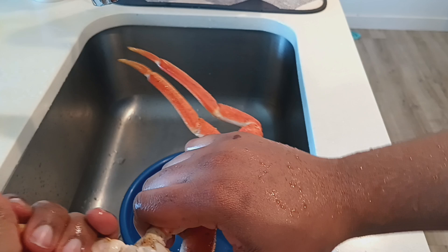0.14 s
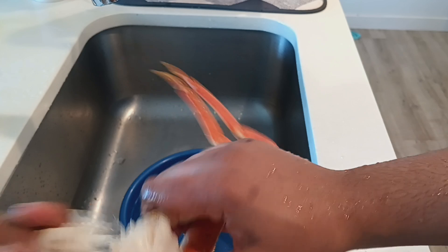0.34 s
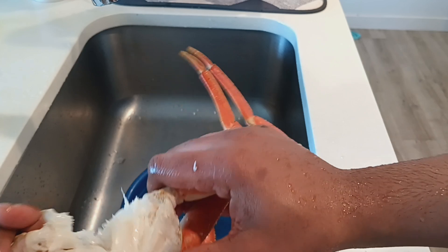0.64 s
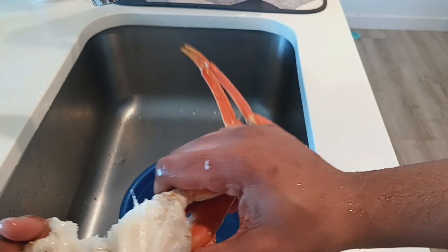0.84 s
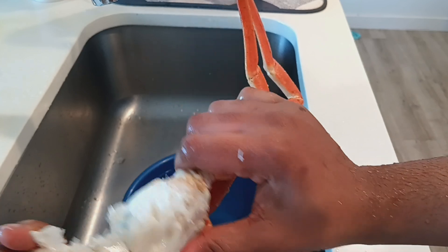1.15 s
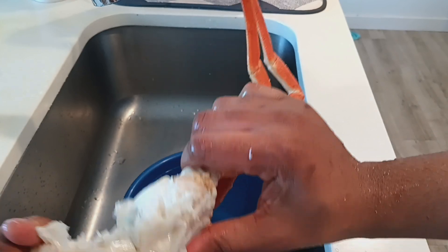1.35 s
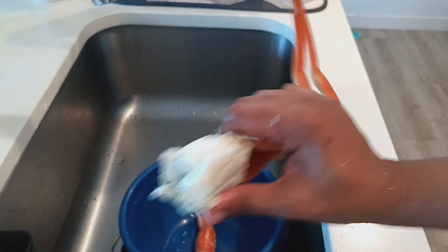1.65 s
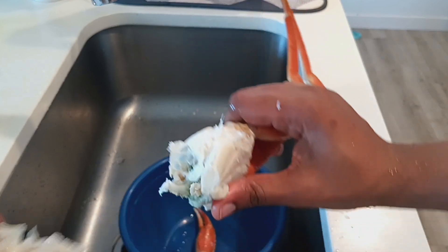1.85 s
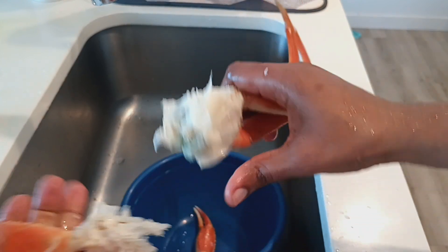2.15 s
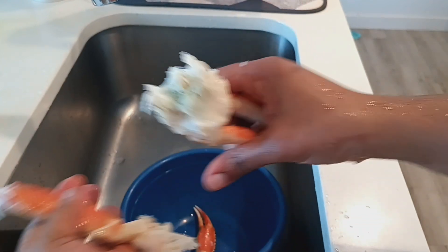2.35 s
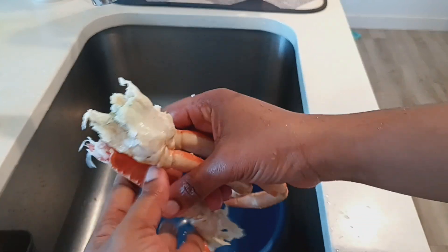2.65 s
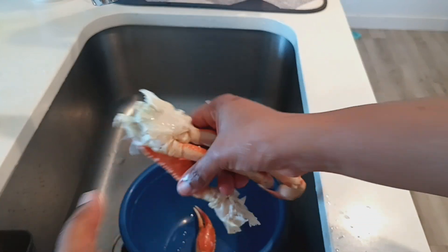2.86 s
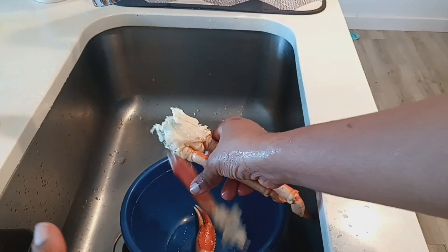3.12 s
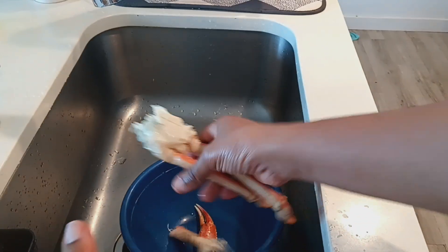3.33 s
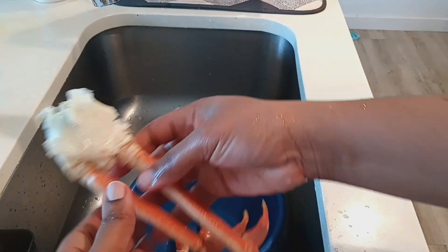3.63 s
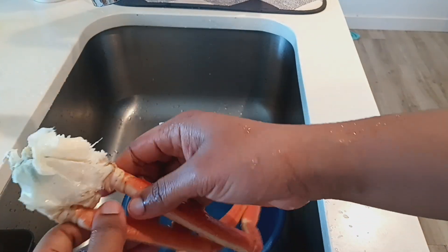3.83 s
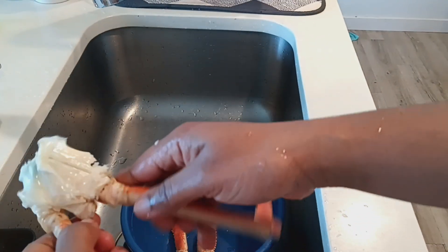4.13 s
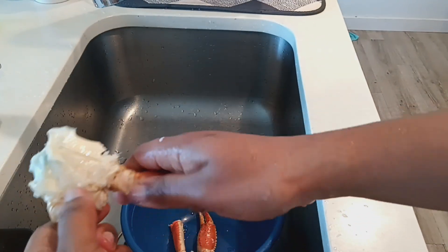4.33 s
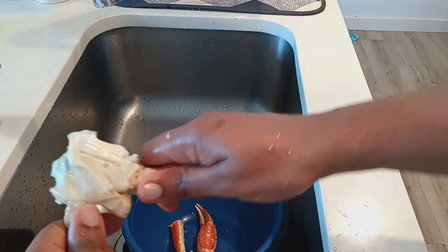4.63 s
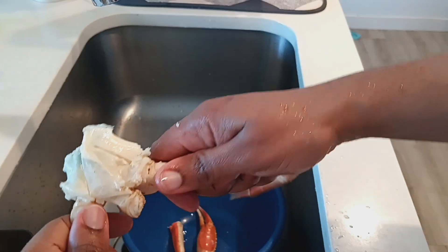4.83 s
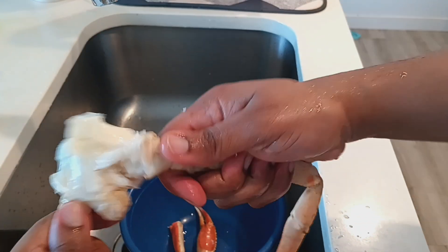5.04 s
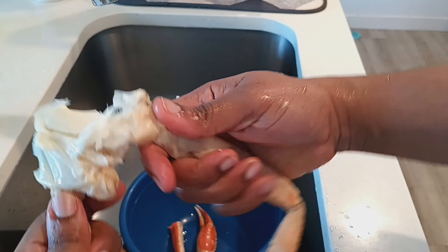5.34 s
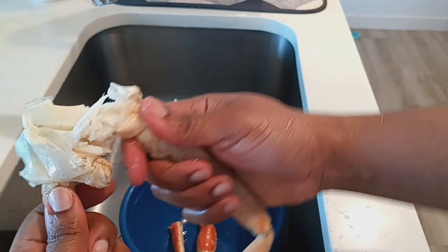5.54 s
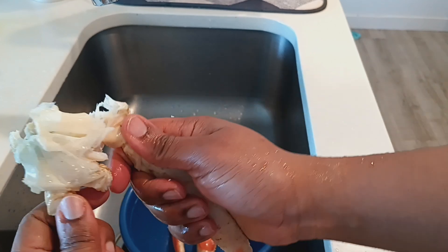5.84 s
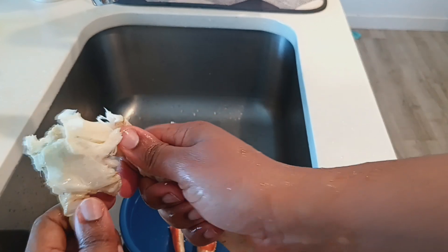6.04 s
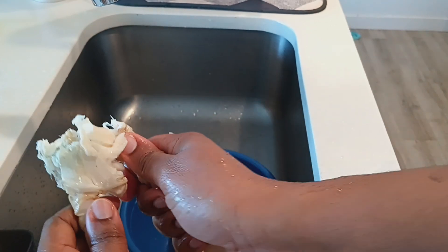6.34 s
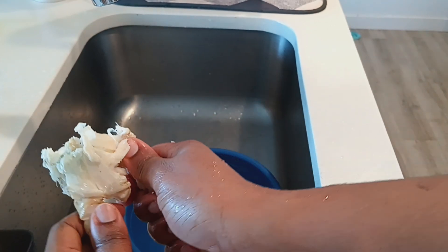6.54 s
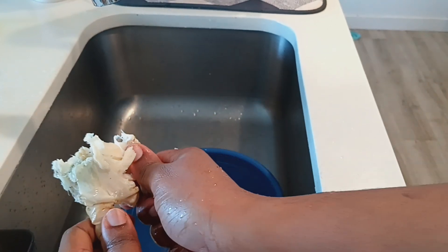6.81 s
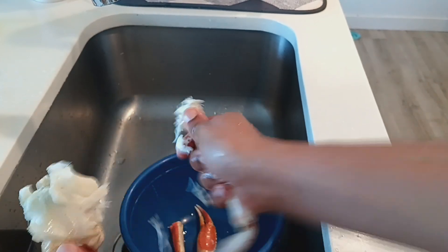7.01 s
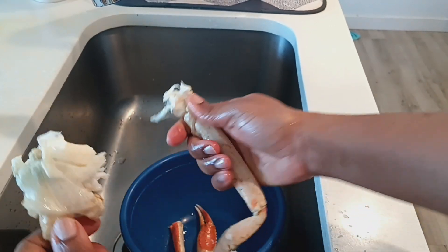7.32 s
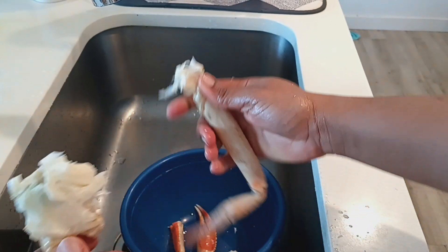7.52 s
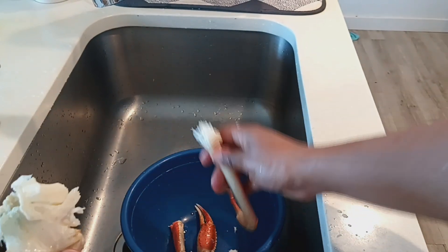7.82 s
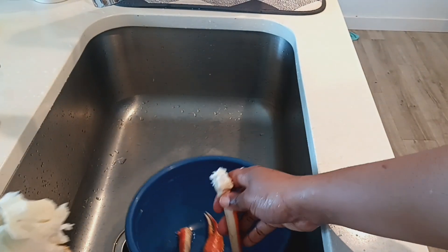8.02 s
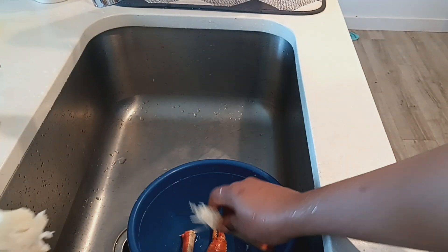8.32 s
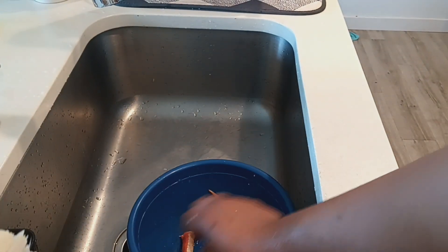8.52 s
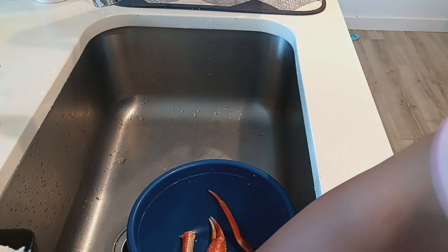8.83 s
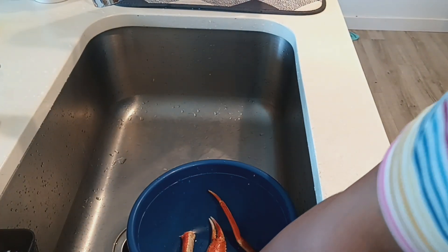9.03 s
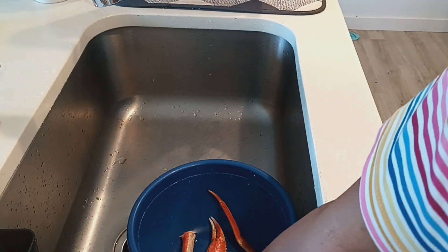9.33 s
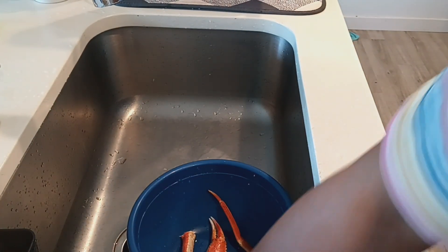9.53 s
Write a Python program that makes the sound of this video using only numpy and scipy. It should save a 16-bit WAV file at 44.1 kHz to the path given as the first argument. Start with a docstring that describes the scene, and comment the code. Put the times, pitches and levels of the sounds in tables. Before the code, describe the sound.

At a kitchen sink, crab shell breaks close by in crisp, splintery bursts with small pops. A clattery knock follows as pieces hit a plastic bowl, then faint wet ticking and rubbing with one hard snap. Shells finally clack and rasp into the bowl, and a thin warble sounds far away. Close stereo microphone, lively room, low hum.

```python
"""Shell snaps and crackles: crab legs are broken apart by hand over a plastic bowl in a steel kitchen sink.
Fractures are bursts of noise shaped by the resonance of each piece; pops are brief decaying tones.
Wet meat peels in tiny ticks, fingers rustle, spines rasp, and blows ring the bowl and boom the basin as modes.
A hard-walled kitchen answers with decaying noise over moving air and a low steady hum.
At the end a thin warble of frequency-modulated tone sounds from far off, with short clear glides."""
import sys
import numpy as np
from scipy import signal
from scipy.fft import rfft, irfft, next_fast_len
from scipy.io import wavfile
from scipy.ndimage import uniform_filter1d, map_coordinates

SR = 44100
rng = np.random.default_rng(int(sys.argv[2]) if len(sys.argv) > 2 else 0)


def transcribe(signal):
    """Save signal, clipped to [-1, 1], as a 16-bit WAV file at the path in sys.argv[1]."""
    frames = np.atleast_2d(signal).T
    limited = np.clip(frames, -1, 1)
    pcm = np.round(limited * 32767).astype(np.int16)
    wavfile.write(sys.argv[1], SR, pcm)


N = 426447

# Coherence of diffuse sound at the two microphones. Each row: frequency in Hz, likeness from 0 to 1.
DIFFUSE_LIKENESS = [(130, 0.59), (300, 0.93), (600, 0.024), (1200, 0.0099), (8000, 0.053)]
# Coherence of echoes at the two microphones. Each row: frequency in Hz, likeness from 0 to 1.
ECHO_LIKENESS = [(130, 0.99), (300, .93), (600, .15), (1200, .01), (8000, .1)]


def cracking(lag_s=0.00024, leg_db=-15, sink_share=0.23):
    """Brittle fracture in runs: the broader the piece, the more it excites the hollow leg and the sink."""
    # Fractures of the shell. Each row: time in seconds, level of the direct tear in dB,
    # pitch of the piece in Hz, fizz (extra treble) in dB, left-over-right level in dB.
    fractures = [(0.068, -23, 1760, 0, -3), (0.1277, -37.5, 3950, 5, -3), (0.1985, -32, 6550, 0, 0.5),
                 (0.2362, -24, 6000, 5.5, -1), (0.2379, -13, 1940, 4.5, -1.5),
                 (0.2421, -26.5, 6500, 2.5, 7.5), (0.2555, -13.5, 2400, 6, 5), (0.2595, -15, 3870, 1, -3),
                 (0.267, -11.5, 4230, -4, -0.5), (0.3163, -25, 6200, 0, -1.5), (0.57, -33, 3060, 2, 2),
                 (0.595, -13.5, 3020, -7, -3), (0.6162, -26, 7150, 3.5, 7.5), (0.6387, -27.5, 7800, 3, 0.5),
                 (0.6749, -39, 6800, 9, 1), (0.8933, -31, 4700, 0, 0), (0.8974, -36, 7500, 7, 0.5),
                 (0.9065, -37.5, 5010, 3, -0.5), (0.911, -37, 4200, 1.5, 0.5), (0.929, -28.5, 7100, -4, 1),
                 (0.9782, -18.5, 1340, 2.5, 2.5), (1.0192, -20, 5070, -2.5, -1),
                 (1.032, -25, 4900, -8.5, -4), (1.0368, -16.5, 5980, -1.5, 2.5),
                 (1.0502, -26.5, 5200, -7, -4.5), (1.062, -35, 1380, 9, -9), (1.4098, -42.5, 6770, 2, -3),
                 (1.4283, -27.5, 5240, -2.5, -0.5), (1.4514, -29.5, 4970, -3.5, 0.5),
                 (1.4765, -20, 6760, 1.5, -4), (1.5042, -27, 5970, -2, -4), (1.5229, -27.5, 7000, 5, -1),
                 (1.528, -19.5, 5900, 3.5, 0.5), (1.5308, -21.5, 3700, -2.5, -2.5),
                 (1.532, -26, 7160, -1, 3.5), (3.2116, -19.5, 4460, -3, 0), (3.229, -33, 4620, 2.5, -4),
                 (3.26, -34.5, 5570, -0.5, 0), (3.5067, -36.5, 4800, -19, 0.5),
                 (4.143, -45.5, 12300, 8, -3), (4.2244, -43.5, 6190, 0, -9), (4.341, -41.5, 6000, -31, -12),
                 (4.3445, -38.5, 1490, -20, -7), (4.3555, -56, 5900, -11, 3), (4.4, -44.5, 7200, -6, -5),
                 (4.415, -41.5, 6900, -1, -5), (4.473, -49, 7000, -2, 4), (4.505, -43, 5540, 4, -1.5),
                 (4.525, -50, 5600, -14, -9), (4.5368, -46.5, 5000, -8, -8), (4.58, -51, 5960, 5, 1),
                 (4.6593, -35.5, 6350, 3, -3.5), (4.734, -37, 6900, 6, -1), (4.831, -35, 6200, 4.5, -2),
                 (4.8525, -36.5, 1250, -5, 2), (4.8675, -30.5, 6700, 10, 2), (4.8758, -40, 6740, -16, -11),
                 (4.948, -31, 1370, -4.5, 0), (4.9643, -28.5, 5870, 3, -10.5),
                 (4.969, -12.5, 2380, -2.5, 0), (5.4203, -47, 7040, -4, -5), (5.4612, -47, 4400, 6, -1),
                 (5.5744, -35, 7500, 4.5, 2.5), (5.615, -45, 6950, -0.5, 8.5), (5.6344, -23, 4530, -12, 3),
                 (5.7466, -43, 7110, -0.5, -3), (5.757, -43.5, 7300, 0, 0), (5.7747, -40.5, 6980, -6, 0),
                 (5.809, -44.5, 7000, -2, -4), (5.976, -41.5, 3350, -1, 1), (6.034, -46, 2400, -8, -4),
                 (6.112, -42, 5600, -24, -4), (6.126, -45, 7000, -8, -3), (6.333, -47.5, 7500, 3, -1.5),
                 (6.2031, -36, 3800, -5.5, -1), (6.2531, -43.5, 3330, -2, -2.5), (6.262, -52, 8600, 7, -5),
                 (6.362, -38, 4140, 3, 1), (6.559, -48, 3970, 3.5, 0), (6.6358, -34, 3320, -2, -3.5),
                 (6.874, -25.5, 3140, 0, 4), (6.8824, -20.5, 1350, -3.5, -1.5)]
    # Modes of a hollow leg. Each row: frequency in Hz, relative level in dB, t60 in seconds.
    leg_modes = [(1231, 1, 0.067), (1534, -7.5, 0.094), (3920, -6.5, 0.067)]
    plate_hz = 1200  # pitch of a broad plate of shell; splinters are higher
    plate_body_db, body_db_per_octave = 4, -4  # the smaller the piece, the less body its snap has
    # a medium snap rings its piece; a harder one tears wider and rings less
    medium_snap_db, medium_ring_db, ring_loss_per_db = -25, 6, 0.28
    lag = round(lag_s * SR)  # samples by which the tear reaches the right microphone later
    track = np.zeros((2, N))
    t = np.arange(SR // 5) / SR
    for s, db, pitch_hz, fizz_db, pan_db in fractures:
        body_db = plate_body_db + body_db_per_octave * np.log2(pitch_hz / plate_hz)
        ring_db = medium_ring_db - ring_loss_per_db * (db - medium_snap_db)
        left, right = snap(pitch_hz, body_db, fizz_db, ring_db)
        late_right = np.pad(right, (lag, 0))[:len(left)]
        # the factor scales modes of energy 1 to the energy of 1 ms at rms 1, like the tear
        x = amp(leg_db + body_db) * np.sqrt(SR / 1000) * ringing(leg_modes, t)
        add(x, 0, np.array([left, late_right]))
        x = in_kitchen(x, sink_db=-6.5 + sink_share * body_db, sink_t60=0.074, room_db=-9.5)
        add(track, s - .0003, amp(db) * placed(x, pan_db))
    return track


def snap(pitch_hz, body_db, fizz_db, ring_db, t60=0.012, rise=0.000037):
    """Impulsive excitation of a resonator: tearing noise rings the piece; energy is that of 1 ms at rms 1."""
    midrange_share = 0.3  # share of the body's gain or loss that reaches up into the midrange
    overtone_ratio, overtone_share = 3.9, 0.39  # second resonance of the piece, and its relative height
    t = np.arange(SR // 40) / SR
    shell = [(60, -23.0), (280, body_db - 2.0), (650, body_db - 0.5), (1150, body_db + 6.0),
             (2200, 8.5 + midrange_share * body_db), (5000, 3), (7300, 3.5),
             (9500, fizz_db - 3.0), (15000, fizz_db - 17.5)]
    tear = burst(t, t60, rise, [(400, 0.96), (2000, 0.92), (10000, 0.073)])
    width = 1.7 / max(ring_db, 7)  # in octaves; the stronger the ring, the narrower

    def colour(hz):
        piece = hump(hz, pitch_hz, width) + overtone_share * hump(hz, overtone_ratio * pitch_hz, width)
        return along(shell, hz) + ring_db * piece + evening_db(tear, hz)

    return unit(coloured(tear, colour, size=1024)) * np.sqrt(SR / 1000 / len(t))


def knocking(blow_t60=0.022, rise=0.0012, strike_db=-6, bowl_db=-8.0, basin_db=-23):
    """Modal excitation by impact: a hard contact and short clatter ring the bowl and boom the basin."""
    # Shell and meat knocking on the bowl and on each other. Each row: time in seconds, level in dB,
    # pitch of the piece in Hz, ring of the piece in dB, thump (bass) in dB, clack (treble) in dB,
    # after-ring of bowl and room in dB.
    blows = [(0.745, -50, 350, 13.5, 0, -40, -15), (0.8034, -47.5, 338, 13, 0.5, -28, -30),
             (0.9794, -41, 261, 4, -1, -10, -28), (1.321, -51, 1920, 9, -10, 3, -13),
             (1.3509, -47.5, 990, 15, 3, -43, -39), (1.527, -39.5, 302, 0, -3, -18, -9.5),
             (1.849, -52, 355, 23, 24.5, 16, -3), (3.11, -40.5, 2370, -2, -21, 5, -0.5),
             (3.132, -47.5, 2500, 8, -9.5, 1, -4), (3.21, -21, 1450, 5.5, -4, 1, -6.5),
             (3.214, -19.5, 1300, 6, -16, -3, -4), (3.2293, -26, 1100, 3, -9, -9.5, -24),
             (3.2409, -27.5, 650, 8, -3, -4, -9.5), (3.257, -25, 167, 0, 6.5, -15, -13),
             (3.2787, -22.5, 800, 5, -12, -6.5, -3.5), (3.2827, -21.5, 1550, 10, -7, -9, -4.5),
             (3.2951, -28.5, 1500, 10, 7.5, -12, -5), (3.317, -34.5, 180, 13, -4, -15, -7),
             (3.35, -29, 1000, 6.5, -4, -8, -3), (3.365, -28.5, 960, 13, -9, -6, -2),
             (3.383, -37.5, 1750, 6, -12, -2, 3), (3.8115, -51, 1480, 7, -19, 0.5, -5),
             (5.268, -48.5, 379, 12, -21, -26, -14), (7.1092, -32.5, 720, 18.5, 1, -5, -8.5),
             (7.1126, -34.5, 1036, 20.5, 0, -4, -6.5), (7.3133, -49.5, 1190, 7, 16.5, -26, -4.5),
             (7.468, -50, 263, 2, 20, -21, -2), (7.492, -51, 370, 15, 2, -24, -10),
             (7.9268, -23.5, 2100, 3.5, -2.5, -6.5, -7.5), (7.934, -29.5, 333, 10, -3, -9, -2.5),
             (7.9668, -37, 1750, 5, -1.5, -7, -5), (8.0125, -23, 525, 8, 8, -4, -5),
             (8.024, -38, 1690, 20, 9, -3, -1), (8.1995, -32.5, 2037, 18, -23, 6, -9),
             (8.284, -47, 2330, 14.5, -15, 10.5, -1), (8.312, -38.5, 1700, 23, -19, 15, -1),
             (8.338, -41.5, 2000, 18, -4.5, 21, -8), (8.3498, -21.5, 1400, 4.5, 0, 1, -4.5),
             (8.3872, -27.5, 1240, -5, 7, -7, -0.5), (8.398, -30, 1600, 3, 1.5, -2, -4),
             (8.402, -30.5, 284, 15, 6, -2, -6), (8.416, -35, 2700, 2, 7, -8, -10),
             (8.4219, -27, 2000, 1, -4, 7.5, -18), (8.425, -27, 1750, 9.5, -4, 2, -12),
             (8.443, -29, 88, 21, 3.5, -5.5, -4), (8.4579, -23, 2100, 10, -8, 4, -8),
             (8.465, -32, 2120, 13, 17.5, 4, -3.5), (8.487, -32.5, 2160, 16.5, 14, 1, -15.5),
             (8.529, -39, 2100, 9, 11, -3, -9), (8.666, -49.5, 680, 15, -1, -0.5, -6.5)]
    # Modes of the plastic bowl. Each row: frequency in Hz, relative level in dB, t60 in seconds.
    bowl_modes = [(245.5, 3, 0.18), (301, -6.5, 0.98), (337, -2.5, 0.46), (373.3, 1, 0.21), (498, -1, 0.49),
                  (576, -9, 0.42), (648, -0.5, 0.54), (744, -0.5, 0.41), (785, -10, 0.42), (962, -1, 0.39),
                  (998, 0.5, 0.54), (1045, -1.5, 0.24), (1120, -4, 0.22), (1170, 1, .34), (1240, 4, 0.17),
                  (1497, -19, 0.49), (1549, -9.5, 0.3), (1613, -11, 0.65), (1744, 1, 0.59), (1890, 1, 0.45),
                  (2094, -5.5, 0.6), (2190, -3, 0.37), (2440, -0.5, 0.38)]
    # Modes of the steel sink under the bowl. Each row: frequency in Hz, relative level in dB, t60 in seconds.
    basin_modes = [(87.5, -12.5, 1), (122.6, -5.5, 0.96), (188.5, 0.5, 0.22)]
    hollow_1khz_db, hollow_db_per_octave = -1.5, -2  # hollow sound of a piece; lighter pieces have less
    track = np.zeros((2, N))
    t = np.arange(SR * 2 // 3) / SR
    for s, db, pitch_hz, piece_db, thump_db, clack_db, after_db in blows:
        hollow_db = hollow_1khz_db + hollow_db_per_octave * np.log2(pitch_hz / 1000)
        contact = [(35, thump_db - 19.0), (75, thump_db - 8.5), (150, thump_db + 8.0),
                   (330, hollow_db + 2.0), (620, hollow_db + 4.0), (820, -3.4), (1200, 1.4), (1950, 0.22),
                   (2900, clack_db - 5.0), (4500, clack_db - 13.5), (8000, clack_db - 22.5),
                   (15000, clack_db - 55.0)]
        colour = lambda hz: along(contact, hz) + piece_db * hump(hz, pitch_hz, octaves=0.32)
        clatter = burst(t[:SR // 12], blow_t60, rise, [(300, 1.0), (800, 0.99), (3000, 0.067)])
        clatter[:, 0] += amp(strike_db)  # the hard first contact
        blow = coloured(clatter, lambda hz: evening_db(clatter, hz))
        # the level is the rms of the blow, in the left channel, spread over 20 ms
        force = amp(db) * np.sqrt(SR / 50) / np.linalg.norm(coloured(blow, colour)[0])
        x = in_kitchen(blow, sink_db=-5.5, sink_t60=0.08, room_db=after_db)[:, :len(t)]
        x = x + amp(bowl_db + after_db) * ringing(bowl_modes, t)
        x = x + amp(basin_db) * ringing(basin_modes, t)
        add(track, s - .0002, force * placed(coloured(x, colour), -0.61))
    return track


def ringing(modes, t):
    """Modal superposition: damped sines, together of energy 1, take new strengths and phases at every blow."""
    detune = 0.004  # share by which the load of shells shifts a mode from blow to blow
    x = np.zeros((2, len(t)))
    for hz, db, t60 in modes:
        # higher modes reach the microphones out of step
        spread = rng.standard_normal((2, 1)) * min((hz / 1000) ** 2, 2)
        phase = rng.uniform(0, 2 * np.pi) + spread
        strength = amp(db + 2.5 * rng.standard_normal())
        shifted_hz = hz * (1 + detune * rng.standard_normal())
        x += strength * fade(t, t60) * np.sin(2 * np.pi * shifted_hz * t + phase)
    onset = 1 - fade(t, 0.0025)
    return unit(x * onset) / np.sqrt(len(t))


def popping(second_db=-12, pan_db=-4):
    """Cavity resonance: a hollow piece or wet pocket sounds one clear pitch that swells and dies in milliseconds."""
    # Pops. Each row: time in seconds, level at the peak of the swell in dB, pitch in Hz, swell in seconds.
    pockets = [(0.2378, -12, 1990, 0.00043), (0.2587, -17.5, 3970, 0.0017), (0.2662, -18, 7580, .0007),
               (0.271, -25, 3860, .0015), (1.0362, -17.5, 3950, .0007), (1.509, -38.5, 398, 0.0026),
               (2.848, -58.5, 6500, .002), (3.026, -49.5, 3300, .001), (3.0262, -43, 620, 0.0017),
               (3.045, -43.5, 510, 0.0026), (3.054, -40.5, 367, 0.0043), (3.113, -36.5, 1620, .003),
               (3.117, -38.5, 2490, 0.0058), (3.23, -18, 308, .002), (3.2787, -10, 630, 0.0018),
               (3.2805, -13.5, 960, 0.0031), (3.364, -24, 985, 0.0027), (4.399, -47.5, 3240, .0008),
               (4.413, -46, 3300, .001), (4.503, -49, 990, 0.002), (4.524, -50, 1020, .0016),
               (4.536, -40.5, 1000, 0.0019), (4.579, -58, 1040, .0015), (4.722, -41, 7070, .0006),
               (4.852, -43, 3630, .0008), (7.11, -33, 183, .007), (7.9264, -15, 1230, .0015),
               (7.927, -17, 291, 0.004), (8.0125, -19, 600, 0.0019), (8.014, -20.5, 251, 0.0038),
               (8.3375, -20, 2500, 0.00085), (8.3496, -14.5, 1770, 0.0015), (8.4234, -20, 1750, .0012),
               (8.457, -14.5, 2120, .001)]
    track = np.zeros((2, N))
    t = np.arange(SR // 12) / SR
    for s, db, pitch_hz, swell_s in pockets:
        # radians between the microphones, growing with pitch
        spread = np.minimum(pitch_hz / 2500, 1) * np.array([[-.6], [.6]])
        first, second = rng.uniform(0, 2 * np.pi, 2)
        phase = 2 * np.pi * pitch_hz * t
        # a fainter second part at the same pitch, with the opposite spread
        tone = np.sin(phase + first + spread) + amp(second_db) * np.sin(phase + second - spread)
        swell = t / swell_s * np.exp(1 - t / swell_s)
        add(track, s, amp(db) * tone * swell)
    return placed(in_kitchen(track, sink_db=-14, sink_t60=0.047, room_db=-14.5)[:, :N], pan_db)


def scraping(rate_hz=600):
    """Stick-slip friction: spines catch and slip hundreds of times a second in a crisp, gritty rasp."""
    # A spiny leg drags over the bowl and the other shells.
    # Each row: start of full effort in seconds, its length in seconds, level of the direct sound in dB.
    drags = [(7.96, 0.079, -48), (8.38, 0.12, -58)]
    slips = (rng.random(N) < rate_hz / SR) * rng.standard_normal((2, N))
    grit = [(300, -12.0), (1200, -4.0), (2100, 7.0), (3200, 5.5), (5000, 0), (7500, -1.5),
            (10000, -14.0), (15000, -23.5)]
    rasp = unit(coloured(slips, lambda hz: along(grit, hz)))
    rasp = rasp * effort(drags, attack_s=0.059, release_s=0.13)
    return in_kitchen(rasp, sink_db=8.5, sink_t60=0.089, room_db=-2.5)[:, :N]


def peeling(count=400, spread_db=4.0, idle_db=-72, attack_s=.12, release_s=0.23):
    """Random micro-fracture: wet fibres part in ticks that a harder pull makes louder and more frequent."""
    # The hands pull meat from the shell. Each row: start of full effort in seconds, its length in seconds,
    # level of the faintest ticks in dB.
    pulls = [(0, .5, -59.5), (.89, .17, -50), (1.43, .11, -57), (4.15, .85, -61.5), (5.56, .26, -57.5),
             (6.1, .55, -65.5)]
    track = np.zeros((2, N))
    pull = amp(idle_db) + effort(pulls, attack_s, release_s)
    progress = np.cumsum(np.sqrt(pull))  # ticks are spread evenly along this curve
    for when, pitch, size in rng.random((count, 3)):
        i = np.searchsorted(progress, when * progress[-1])
        gain = pull[i] * amp(spread_db * min(-np.log(size), 3))
        tick = snap(2900 * 3.2 ** pitch, body_db=-7.0, fizz_db=-4.5, ring_db=12, t60=0.0062)
        add(track, i / SR, gain * tick)
    return in_kitchen(track, sink_db=-15.5, sink_t60=0.041, room_db=-6.0)[:, :N]


def rubbing(idle_db=-74, attack_s=0.23, release_s=0.27):
    """Sliding friction as filtered noise: fingers over wet shell make a soft, slightly uneven rustle."""
    # Wet fingers slide to a new grip.
    # Each row: start of full effort in seconds, its length in seconds, level in dB.
    strokes = [(0, 0.27, -55.5), (2.9, 1.1, -62), (5.33, 0.4, -57.5), (6.22, 0.46, -58.5), (7.5, 0.18, -56),
               (9.6, 0.12, -57.5)]
    # Spectrum of the rustle. Each row: frequency in Hz, relative level per Hz in dB.
    rub_spectrum = [(60, -9.5), (130, -13), (380, 7), (750, -5.5), (1500, -7.5), (4000, -14.5), (8000, -26),
                    (15000, -59)]
    rustle = unit(coloured(pair(N, DIFFUSE_LIKENESS), lambda hz: along(rub_spectrum, hz)))
    uneven_db = 1.3 * wobble(35)
    return placed(rustle, -2.5) * amp(uneven_db) * (amp(idle_db) + effort(strokes, attack_s, release_s))


def warbling(turns_per_s=70, flutter_db=2.0, attack_s=0.17, release_s=.22):
    """Random frequency modulation: a hissy whistle glides, so far away that only its echo arrives."""
    # Thin, far-off warbles. Each row: start of full level in seconds, its length in seconds, level in dB,
    # centre in Hz, swing in Hz per unit of a random curve, hiss (greatest fast deviation) in Hz.
    whistles = [(8.619, 0.76, -58, 3420, 232.3, 300), (9.106, 0.078, -62.5, 4030, 150, 200),
                (9.53, .15, -55, 3590, 253, 900)]
    whistle = np.zeros(N)
    for s, length, db, centre_hz, swing_hz, hiss_hz in whistles:
        swing = swing_hz * np.clip(wobble(turns_per_s), -1.6, 1.6)
        hiss = hiss_hz * np.tanh(wobble(900))
        pitch = centre_hz + swing + hiss
        tone = unit(np.sin(2 * np.pi * np.cumsum(pitch) / SR) * amp(flutter_db * wobble(14)))
        whistle += tone * effort([(s, length, db)], attack_s, release_s)
    echo = burst(np.arange(SR // 3) / SR, t60=0.79, rise=0.0017, alike=ECHO_LIKENESS)
    return signal.fftconvolve(whistle[None], echo, axes=1)[:, :N]


def gliding(bend=1.75):
    """Frequency sweep: short, clean whistles bend up or down, each trailed by its echo."""
    # Clear glides that stand out of the warble. Each row: start in seconds, length in seconds,
    # peak level of the direct sound in dB, first pitch in Hz, last pitch in Hz.
    sweeps = [(8.673, .05, -67, 3880, 3910), (8.732, 0.043, -59, 3620, 3100), (8.842, .06, -55, 3330, 3600),
              (8.885, 0.052, -56, 3480, 3100), (8.98, 0.1, -59.5, 4010, 3660),
              (9.048, 0.036, -54, 3560, 3200), (9.17, .05, -56.5, 3320, 3680),
              (8.824, .04, -58, 3830, 4070), (9.003, .05, -60, 3040, 3060), (9.195, 0.033, -58, 3980, 4000),
              (9.345, .055, -58, 3400, 3670)]
    track = np.zeros((2, N))
    for s, length, db, from_hz, to_hz in sweeps:
        u = np.arange(round(length * SR)) / (length * SR)  # 0 to 1 along the glide
        pitch = from_hz + (to_hz - from_hz) * u ** bend
        tone = np.sin(np.pi * u) * np.sin(2 * np.pi * np.cumsum(pitch) / SR)
        add(track, s, amp(db) * tone * np.ones((2, 1)))
    return in_kitchen(track, sink_db=-10, sink_t60=0.072, room_db=-5)[:, :N]


def room_tone(air_db=-56):
    """Stationary background: moving air as filtered noise, an appliance's hum as sines of wandering phase."""
    # Spectrum of the air. Each row: frequency in Hz, relative level per Hz in dB.
    air_spectrum = [(15, -49.5), (25, -32.5), (64, -8), (123, -5), (206, -10), (242, -5.5), (263, -9.5),
                    (373, -7), (476, -11), (531, -6), (775, -12.5), (1370, -15), (4140, -28), (6920, -35),
                    (16000, -53)]
    # Hum of a kitchen appliance. Each row: frequency in Hz, rms level in dB.
    hum_tones = [(121, -67.5), (240, -67.5), (365, -73)]
    t = np.arange(N) / SR
    air = amp(air_db) * unit(coloured(pair(N, DIFFUSE_LIKENESS), lambda hz: along(air_spectrum, hz)))
    hum = sum(amp(db) * np.sqrt(2) * np.sin(2 * np.pi * hz * t + 0.57 * wobble(2.1))
              for hz, db in hum_tones)
    return placed(air + hum, -0.19)


def in_kitchen(x, sink_db, sink_t60, room_db):
    """Reverberation by convolution: direct sound, a quick flutter between the sink walls, the room's tail."""
    # Reverberation time of the kitchen. Each row: frequency in Hz, t60 in seconds.
    room_t60 = [(100, 1), (300, 0.44), (800, 0.6), (2000, 0.61), (4000, 0.52), (8000, 0.42), (15000, 0.31)]
    hz, t, z = signal.stft(pair(SR * 2 // 3, ECHO_LIKENESS), SR, nperseg=256)
    tail = signal.istft(z * fade(t, along(room_t60, hz)[:, None]), SR, nperseg=256)[1]
    t = np.arange(tail.shape[1]) / SR
    tail = tail * (1 - fade(t, 0.012))
    flutter = pair(len(t), ECHO_LIKENESS) * fade(t, sink_t60) * (1 - fade(t, 0.0027))
    response = (amp(room_db) * unit(tail) + amp(sink_db) * unit(flutter)) / np.sqrt(len(t))
    response[:, 0] += 1  # the direct sound
    return signal.fftconvolve(x, response, axes=1)


def effort(moves, attack_s, release_s):
    """Gain envelope of movements: each swells ahead of its start, holds for its length and lets go."""
    t = np.arange(N) / SR
    total = 0
    for s, length, db in moves:
        swell = 1 + (t - s) / attack_s
        let_go = 1 - (t - s - length) / release_s
        total = total + amp(db) * np.clip(np.minimum(swell, let_go), 0, 1) ** 2
    return total


def burst(t, t60, rise, alike):
    """Transient noise of energy 1 at each microphone that swells and decays exponentially."""
    envelope = fade(t, t60) * (1 - np.exp(-t / rise))
    x = pair(len(t), alike) * envelope
    return x / np.sqrt(np.sum(x ** 2, axis=1, keepdims=True))


def pair(count, alike):
    """Interchannel coherence: white noise at both microphones with a given likeness per frequency."""
    turn = np.arccos(np.clip(along(alike, np.fft.rfftfreq(count, 1 / SR)), -1, 1)) / 2
    mid, side = irfft(rfft(rng.standard_normal((2, count))) * [np.cos(turn), np.sin(turn)], count)
    return np.array([mid + side, mid - side])


def coloured(x, gain_db, size=4096):
    """Minimum-phase (causal) filtering by the folded cepstrum of a function from Hz to dB."""
    cepstrum = irfft(np.log(amp(gain_db(np.fft.rfftfreq(size, 1 / SR)))))
    cepstrum[1:size // 2] *= 2
    cepstrum[size // 2 + 1:] = 0
    response = irfft(np.exp(rfft(cepstrum)))
    return signal.fftconvolve(x, response[None], axes=1)[:, :x.shape[1]]


def evening_db(x, hz):
    """Spectral whitening: gain that evens out the chance peaks and holes of a short burst."""
    power = uniform_filter1d(np.mean(np.abs(rfft(x)) ** 2, axis=0), size=3)
    return -10 * np.log10(np.interp(hz, np.fft.rfftfreq(x.shape[1], 1 / SR), power) + 1e-3)


def hump(hz, centre_hz, octaves):
    """Resonance curve of height 1 on a log axis, at half height the given octaves from its centre."""
    return 1 / (1 + (np.log2((hz + 1) / centre_hz) / octaves) ** 2)


def placed(x, pan_db):
    """Level-difference panning: a positive value leans a stereo sound to the left."""
    return x * amp([[pan_db / 2], [-pan_db / 2]])


def add(track, s, sound):
    """Superposition: mix a stereo sound in at time s."""
    start = max(round(s * SR), 0)
    track[:, start:start + sound.shape[1]] += sound[:, :max(N - start, 0)]


def fade(t, t60):
    """Exponential decay, 60 dB in t60."""
    return np.exp(-np.log(1000) * t / t60)


def wobble(rate):
    """Slow random modulation: a smooth curve with rate knots a second."""
    return map_coordinates(rng.standard_normal(int(N * rate / SR) + 4), [np.arange(N) * rate / SR])


def along(points, hz):
    """Interpolation of (Hz, value) points on a log frequency axis."""
    f, v = np.transpose(points)
    return np.interp(np.log(hz + 1), np.log(f), v)


def amp(db):
    """Decibels to amplitude gain."""
    return 10 ** (np.asarray(db) / 20)


def unit(x):
    """Normalisation to rms 1."""
    return x / np.sqrt(np.mean(x ** 2) + 1e-20)


def scene():
    """Superposition of everything heard at the sink."""
    shell = cracking() + knocking() + popping() + scraping()
    hands = peeling() + rubbing()
    far_off = warbling() + gliding()
    return shell + hands + far_off + room_tone()


def record(dry):
    """Microphone response: the pair differ in colour, shed the deepest bass and stop at a band limit."""
    top_hz = 16300
    size = next_fast_len(N + SR // 2)
    hz = np.fft.rfftfreq(size, 1 / SR)
    # left-over-right level
    lean_db = along([(120, -0.5), (500, -5.0), (1000, -5.0), (2000, 0.5), (4000, -2.5), (8000, -0.5),
                     (13000, 2.0)], hz)
    bass_db = along([(25, -18), (40, -2.0), (55, -1.0)], hz)
    gain = amp([bass_db + lean_db / 2, bass_db - lean_db / 2]) * (hz < top_hz)
    return irfft(rfft(dry, size) * gain, size)[:, :N]


dry = scene()
out = record(dry)
transcribe(out)
```